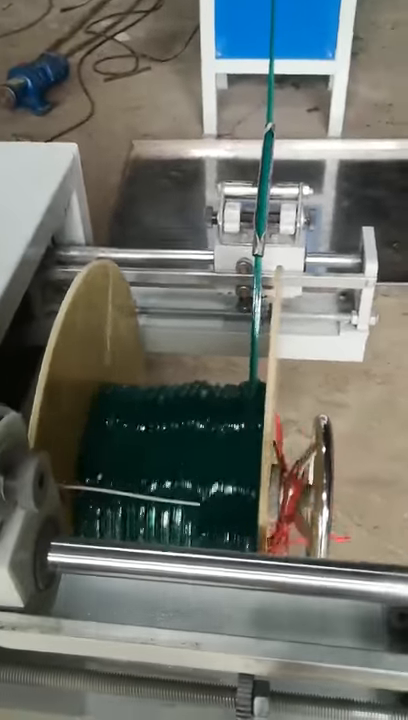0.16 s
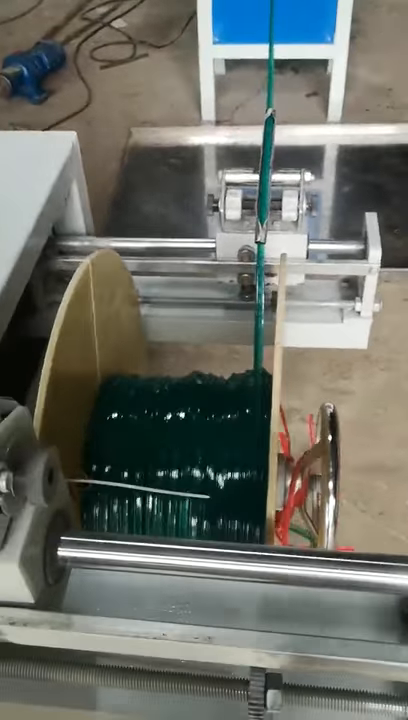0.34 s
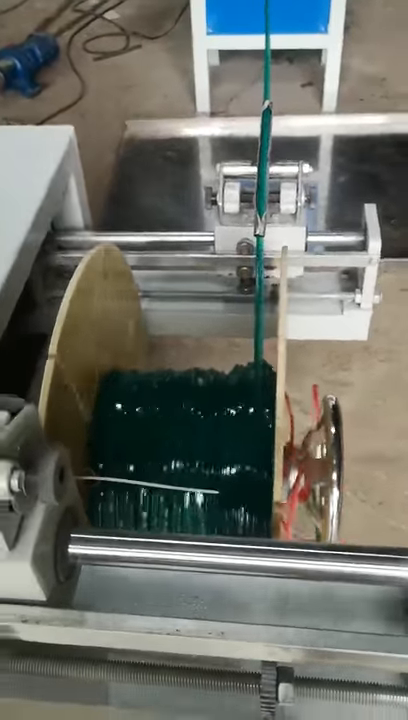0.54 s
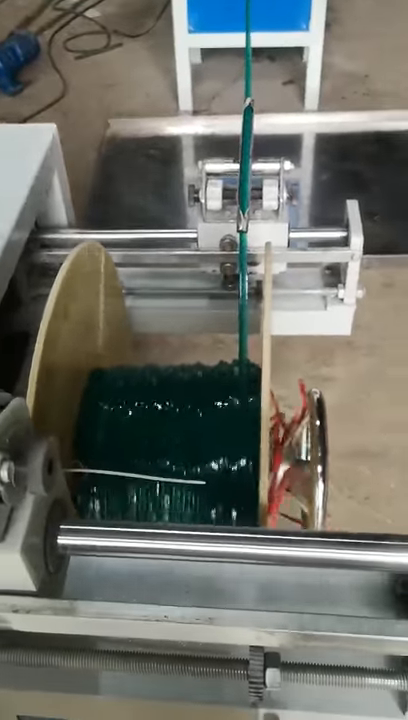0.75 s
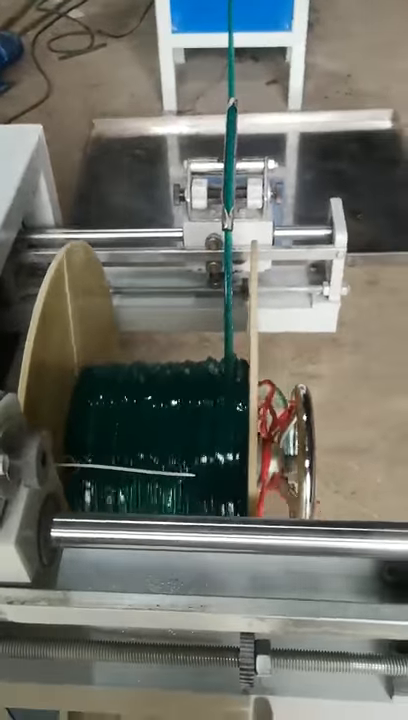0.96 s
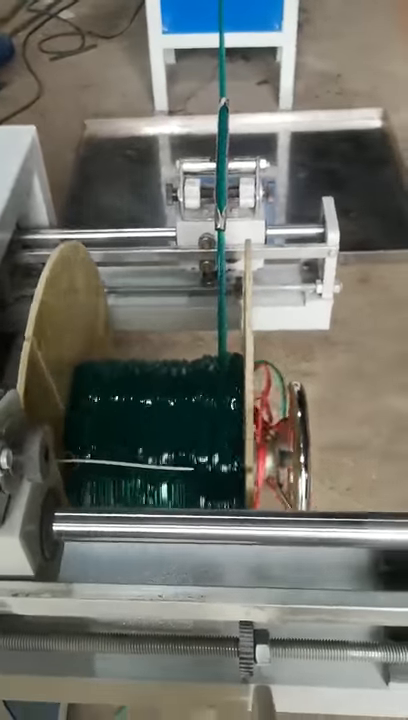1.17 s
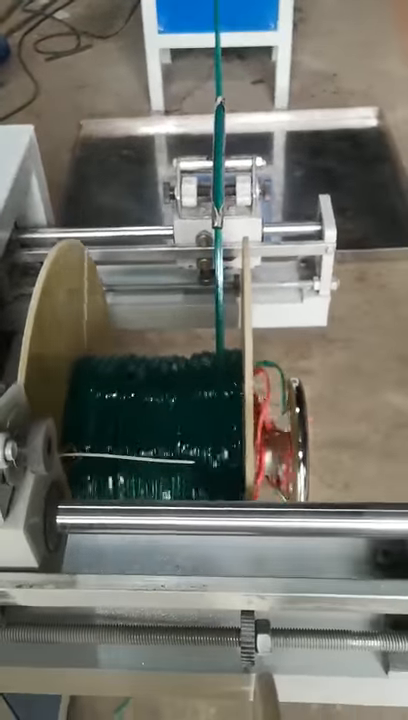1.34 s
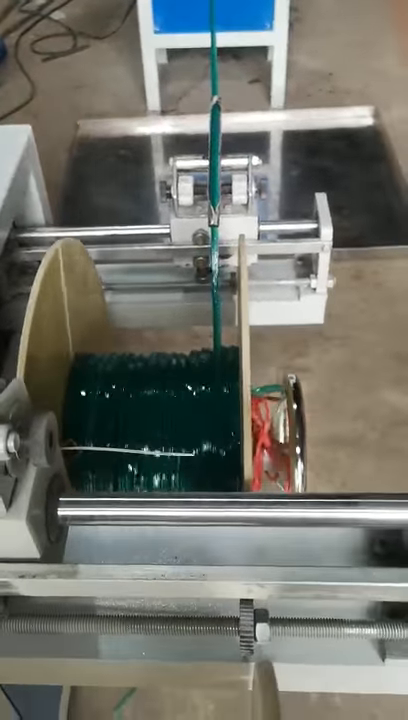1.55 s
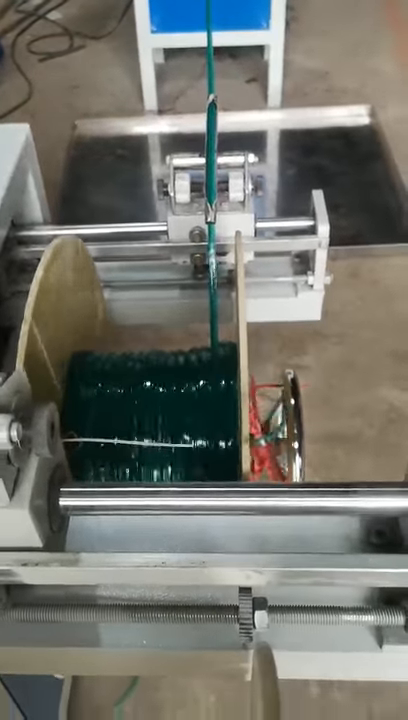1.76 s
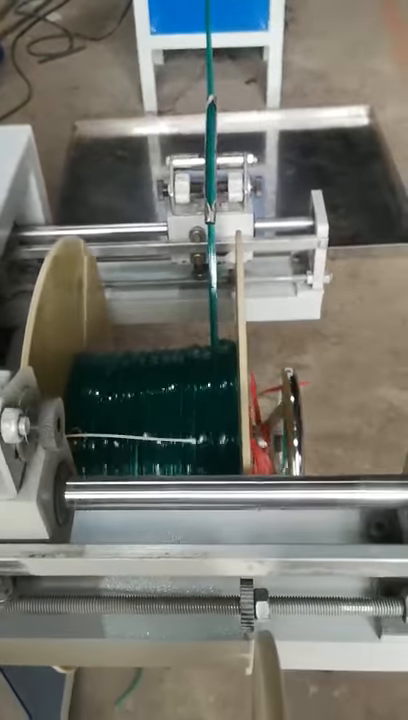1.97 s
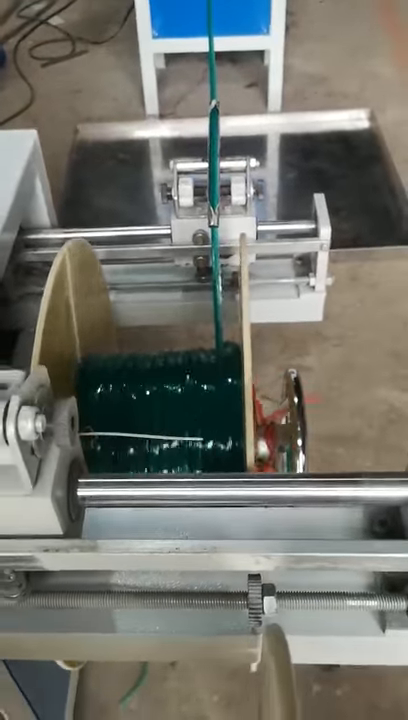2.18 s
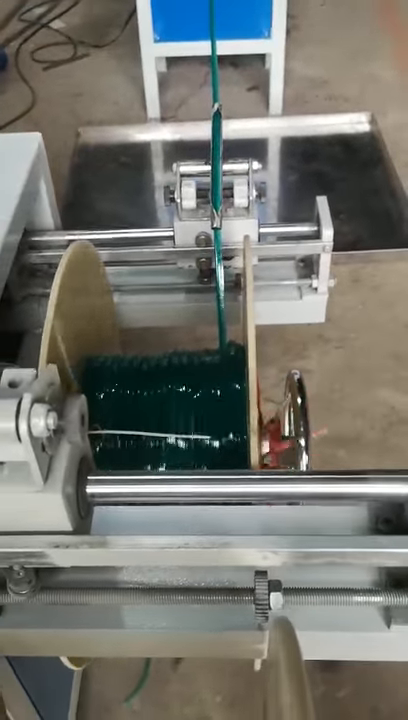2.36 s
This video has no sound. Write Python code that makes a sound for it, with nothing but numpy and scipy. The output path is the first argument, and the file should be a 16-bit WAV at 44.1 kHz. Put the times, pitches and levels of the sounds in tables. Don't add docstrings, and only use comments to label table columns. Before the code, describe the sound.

Close stereo pickup of a strip winder in a hard-floored shop, low rumble and motor hum under a thin unsteady electric whine, a brief soft scuff midway, and finally a sharp, bright snap with rapid chatter.

```python
import sys
import numpy as np
from scipy import signal
from scipy.io import wavfile
from scipy.ndimage import uniform_filter1d

SR = 44100
rng = np.random.default_rng(int(sys.argv[2]) if len(sys.argv) > 2 else 0)


def inscribe(sig):
    pcm = np.round(np.clip(np.atleast_2d(sig).T, -1, 1) * 32767)
    wavfile.write(sys.argv[1], SR, pcm.astype(np.int16))


def invert_db(x):
    u = np.asarray(x, float) / 20
    return 10 ** u


N = 111132
T = np.arange(N) / SR

# pitch_hz, density_db_per_hz
RUMBLE_SPECTRUM = [(10, -12), (30, -0.5), (62, 2), (78, -6.5), (160, -9.5), (250, -10.5), (330, -21),
                   (450, -55)]
ROAR_SPECTRUM = [(500, -0.5), (1000, -9.5), (1900, -5), (3000, -6.5), (4600, -4.5), (7000, -19.5),
                 (8500, -17.5), (9500, -41.5)]
HISS_SPECTRUM = [(8000, -12.5), (9000, -4), (9600, -6.5), (10100, -7), (10800, -6), (12500, -8.5),
                 (13400, -14), (14500, -10.5)]
# pitch_hz, left_minus_right_db
NOISE_LEAN = [(300, 0.5), (800, 0), (1900, 7.5), (3200, 0.5), (4800, 7.5), (8500, 39), (10000, 4),
              (14000, -6)]
# pitch_hz, correlation
NOISE_LIKENESS = [(60, 1), (130, 0.91), (290, 0.86), (500, -0.56), (1400, 0.43), (3000, -0.21),
                  (15000, 0.1)]
MOTOR_ORDERS = [1, 2, 3, 4, 5]
PUMP_ORDERS = [1, 2, 3, 4]
MAINS_ORDERS = [4, 6, 10, 12, 16, 18, 20, 22]
GEAR_ORDERS = [8, 13, 14, 15, 16]
FAN_HZ = [26.96, 58.33, 60.81, 496.44, 856.2]
PUMP_HZ = [64.02, 64.85]
# level_db, left_minus_right_db, left_lead_rad
MOTOR_TONES = [(-47, 0, 0), (-30, 0, -.1), (-53, -1, -.2), (-53, 0, -.2), (-55, -1, -.2)]
PUMP_TONES = [
    [(-46, -1, -.1), (-46, 1, -.2), (-53, 0, -.5), (-70, 0, 0)],
    [(-57, 0, -.3), (-46, 0, -.2), (-50, 0, -.3), (-62, 1, .4)],
]
MAINS_TONES = [(-60, 0, -.2), (-45.5, -2, .2), (-73, -1, -1.9), (-64.5, 4, -.9), (-70.5, -4, -.5),
               (-70.5, -8, .5), (-77, -10, -1.7), (-77, -6, 1.6)]
GEAR_TONES = [(-72, -14, -1), (-63, 8, -1.7), (-67, 12, 2.5), (-68, -8, 1.9), (-70, 6, -3.1)]
FAN_TONES = [(-48, 0, 0), (-50, 0, -.2), (-50, 0, -.2), (-65, -10, 2.3), (-75, 9, .2)]
# pitch_hz, level_db, left_minus_right_db, share_of_load, share_of_wander
CARRIER_LINES = [(4030, -44.5, 0, 0.84, 1), (7940, -57.5, 8.5, 0.3, 1.3), (11700, -77, 5, 0.18, 1.5),
                 (4530, -63, 15, 0.62, 0.458), (6580, -73.5, -16, 0.92, 0.347), (3680, -60.5, 18, 1, .7),
                 (2865, -63, 1, 1, 2)]
# time_s, load_db, carrier_hz
DRIVE_LOAD = [(0.0, -51, 4030), (0.15, -52, 4030), (0.32, -46.5, 4029), (0.75, -45, 4038),
              (0.899, -46.5, 4010), (1.05, -46, 4009), (1.17, -54, 4022), (1.4, -52, 4033),
              (1.56, -49.5, 4010), (1.8, -51.5, 3996), (2.1, -53.5, 4009), (2.44, -50.5, 4041)]
# time_s, level_db
RUB_LEVEL = [(0, -53), (.6, -53.5), (1, -49.5), (1.45, -51), (1.6, -56), (2.52, -66)]
# pitch_hz, density_db_per_hz
RUB_SPECTRUM = [(1200, -37), (1700, -4), (2100, -7), (2600, -23), (4000, -7), (4700, -5.5), (5400, -16),
                (7000, -15.5)]
SCUFF_SPECTRUM = [(800, -21), (2000, 13), (4000, -17), (7000, -3), (9500, -9), (11500, -27)]
# start_s, length_s, level_db
SCUFFS = [
    (1.292, 0.01, -64),
    (1.483, 0.046, -48.5),
    (1.514, 0.046, -49),
    (2.08, 0.0092, -64),
]
# start_s, level_db
SNAP_BLOWS = [(2.4631, -24), (2.4640, -8), (2.4652, -19), (2.4664, -27), (2.4690, -30), (2.4706, -29),
              (2.4716, -28), (2.4728, -26), (2.4736, -27), (2.4778, -34), (2.4820, -36)]
# pitch_hz, level_db, t60_s
PART_MODES = [(483, -17, 0.022), (1130, -10, 0.02), (1490, -18, 0.0099), (2200, -4, 0.019),
              (2630, 3.5, 0.014), (3830, -7, 0.0058), (4500, -8.5, 0.013), (5290, 2, 0.012),
              (6310, 4, 0.008), (7950, 0, 0.0091), (9500, -3, 0.0077), (10450, -1.5, 0.0052),
              (12060, -10, 0.0042), (14200, -21, .003)]
# pitch_hz, t60_s
SHOP_T60 = [(500, 1), (4000, 0.43), (10000, 0.22), (14000, .08)]


def evened(x):
    return x / np.sqrt(np.mean(x ** 2) + 1e-20)


def read(points, hz):
    point_hz, value = np.transpose(points)
    return np.interp(np.log(hz + 1), np.log(point_hz + 1), value)


def sides(pan_db):
    gain = invert_db(np.array([pan_db / 2, -pan_db / 2]))
    return gain / np.sqrt(np.mean(gain ** 2, 0))


def drift(top_hz):
    low_pass = signal.butter(2, top_hz, fs=SR)
    raw = rng.standard_normal(N + SR)
    return evened(signal.lfilter(*low_pass, raw)[SR:])


def load_db():
    time_s, level_db, _ = np.transpose(DRIVE_LOAD)
    load = np.interp(T, time_s, level_db)
    return load - load.mean()


def noise(spectrum, size, patchy_db, flicker_db, lean=0.47):
    hop = size // 4
    frames = N // hop + 5
    hz = np.fft.rfftfreq(size, 1 / SR)
    a, b, c, d, patch = rng.standard_normal((frames, len(hz), 5)).T
    patch = uniform_filter1d(patch, size // 80 + 1, 0)
    patch = evened(uniform_filter1d(patch, 3000 // hop + 1, 1))

    same = np.clip(read(NOISE_LIKENESS, hz), -1, 1)[:, None]
    left, other = a + 1j * b, c + 1j * d
    z = np.array([left, same * left + np.sqrt(1 - same ** 2) * other])

    flicker = flicker_db * rng.standard_normal(frames)
    z *= invert_db(read(spectrum, hz)[:, None] + patchy_db * patch + flicker)
    inside = (hz > spectrum[0][0] / 2) & (hz < spectrum[-1][0] * 1.08)
    z *= (inside * sides(lean * read(NOISE_LEAN, hz)))[:, :, None]
    return evened(signal.istft(z, nperseg=size, noverlap=size - hop)[1][:, :N])


def tones(hzs, rows, in_step_s=None):
    waver_db, waver_hz = 0.88, 3.56
    out = np.zeros((2, N))
    for hz, (level_db, pan_db, lead_rad) in zip(hzs, rows):
        phase = rng.uniform(-np.pi, np.pi) if in_step_s is None else -2 * np.pi * hz * in_step_s
        level = np.sqrt(2) * invert_db(level_db + waver_db * drift(waver_hz))
        lag = np.array([[0], [lead_rad]])
        out += sides(pan_db)[:, None] * level * np.cos(2 * np.pi * hz * T + phase - lag)
    return out


def walked(x):
    walk_s, walk_depth = 0.08, 0.4
    z = signal.stft(x, nperseg=2048, noverlap=1536)[2]
    raw = rng.standard_normal((z.shape[2], z.shape[1], 2, 2), np.float32).T
    re, im = uniform_filter1d(raw, round(walk_s * SR / 512))
    room = re + 1j * im
    room = room / abs(room) ** (1 - walk_depth)
    return signal.istft(z * room / np.std(room.real), nperseg=2048, noverlap=1536)[1][:, :N]


def shop(x):
    hz, t, z = signal.stft(rng.standard_normal((2, SR // 2)), SR, nperseg=256)
    z *= invert_db(-60 * t / read(SHOP_T60, hz)[:, None])
    z = z / np.linalg.norm(z, axis=2, keepdims=True)
    tail = signal.istft(z, SR, nperseg=256)[1]
    tail = tail / np.linalg.norm(tail[0])
    return signal.fftconvolve(x * np.ones((2, 1)), tail, axes=1)[:, :x.shape[-1]]


def air():
    rumble_db, roar_db, hiss_db, load_share = -39, -47.5, -73, 0.07
    roar_level = invert_db(roar_db + load_share * uniform_filter1d(load_db(), SR // 3))
    out = invert_db(rumble_db) * noise(RUMBLE_SPECTRUM, size=4096, patchy_db=0.5, flicker_db=0)
    out += roar_level * noise(ROAR_SPECTRUM, size=512, patchy_db=0.6, flicker_db=0.9)
    return out + invert_db(hiss_db) * noise(HISS_SPECTRUM, size=512, patchy_db=4.0, flicker_db=1.5)


def machines():
    motor_hz, mains_hz, gear_hz, in_step_s = 24.98, 50.027, 153.67, 0.01
    out = tones(motor_hz * np.array(MOTOR_ORDERS), MOTOR_TONES)
    out += tones(mains_hz * np.array(MAINS_ORDERS), MAINS_TONES)
    out += tones(gear_hz * np.array(GEAR_ORDERS), GEAR_TONES)
    out += tones(FAN_HZ, FAN_TONES)
    for hz, rows in zip(PUMP_HZ, PUMP_TONES):
        out += tones(hz * np.array(PUMP_ORDERS), rows, in_step_s)
    return out


def inverter():
    drives, wander_hz, wander_share, wild = 14, 80, 0.014, 0.25
    widen, cross = 0.3, -0.14
    steady_s, steady = 0.05, 0.75
    load = load_db()
    time_s, _, carrier_hz = np.transpose(DRIVE_LOAD)
    slow = uniform_filter1d(np.interp(T, time_s, carrier_hz / carrier_hz.mean() - 1), SR // 8)
    wander = np.array([drift(wander_hz) for _ in range(drives)])
    wander = wander + wild * wander ** 3
    slip_s = np.cumsum(wander_share * invert_db(widen * load) * wander + slow, 1) / SR

    whine = np.zeros((2, N))
    for hz, level_db, pan_db, share, spread in CARRIER_LINES:
        line = np.cos(2 * np.pi * hz * (T + spread * slip_s)).sum(0)
        left, right = walked(line[None])
        heard = sides(pan_db)[:, None] * np.array([left, right + cross * left])
        power = uniform_filter1d(heard.mean(0) ** 2, round(steady_s * SR))
        power = uniform_filter1d(power, round(steady_s * SR))
        whine += invert_db(level_db + share * load) * evened(heard / power ** (steady / 2))
    return whine


def strip():
    rub_level = invert_db(np.interp(T, *np.transpose(RUB_LEVEL)))
    rub = rub_level * noise(RUB_SPECTRUM, size=256, patchy_db=1.5, flicker_db=3.5, lean=2.1)
    stroke = np.zeros(N)
    for start_s, length_s, level_db in SCUFFS:
        stroke += invert_db(level_db) * np.sin(np.pi * np.clip((T - start_s) / length_s, 0, 1))
    return rub + stroke * noise(SCUFF_SPECTRUM, size=256, patchy_db=2.5, flicker_db=2.0)


def snap():
    crack_db, crack_t60_s, rise_s, scatter = -9, 0.005, 0.00017, 0.008
    right_lag_s, right_db, dulling = 0.00023, 1.5, 1.4
    ring_wet_db, crack_wet_db = -28, -8
    out, cracks = np.zeros((2, N)), np.zeros(N)
    t = np.arange(2000) / SR
    rise = 1 - np.exp(-t / rise_s)
    for start_s, blow_db in SNAP_BLOWS:
        luck = rng.uniform(-1, 1, (len(PART_MODES), 2))
        grit = np.gradient(uniform_filter1d(rng.standard_normal(len(t)), size=3)) * 2
        crack = invert_db(crack_db - 60 * t / crack_t60_s) * grit
        for side, (lag_s, side_db) in enumerate([(0, 0), (right_lag_s, right_db)]):
            at = round((start_s + lag_s) * SR)
            ring = np.zeros(len(t))
            for (hz, level_db, t60_s), (detune, phase) in zip(PART_MODES, luck):
                loss_db = side * dulling * read(NOISE_LEAN, hz)
                mode = np.sin(2 * np.pi * hz * (1 + scatter * detune) * t + phase)
                ring += invert_db(level_db - 60 * t / t60_s - loss_db) * mode
            blow = ((ring + crack) * rise)[:N - at] / 3
            out[side, at:at + len(t)] += invert_db(blow_db + side_db) * blow
        cracks[at:at + len(t)] += invert_db(blow_db) * crack[:N - at]
    ring_tail = invert_db(ring_wet_db) * shop(out[0])
    crack_tail = invert_db(crack_wet_db) * shop(uniform_filter1d(cracks, size=3))
    return out + ring_tail + crack_tail


def scene():
    return air() + machines() + inverter() + strip() + snap()


def top_cut(x):
    return signal.sosfilt(signal.butter(12, 15590, fs=SR, output="sos"), x)


def record(dry):
    fade_in_s, edge_hz = 0.001, 15400
    faded = dry * np.minimum(T / fade_in_s, 1)
    low_pass = signal.firwin(511, edge_hz, window=("kaiser", 9), fs=SR)[None]
    mix = signal.oaconvolve(faded, low_pass, "same")
    return top_cut(mix)


dry = scene()
out = record(dry)
inscribe(out)
```